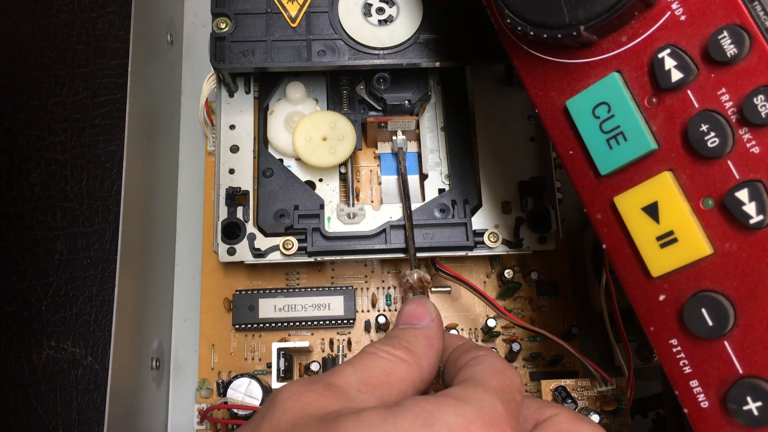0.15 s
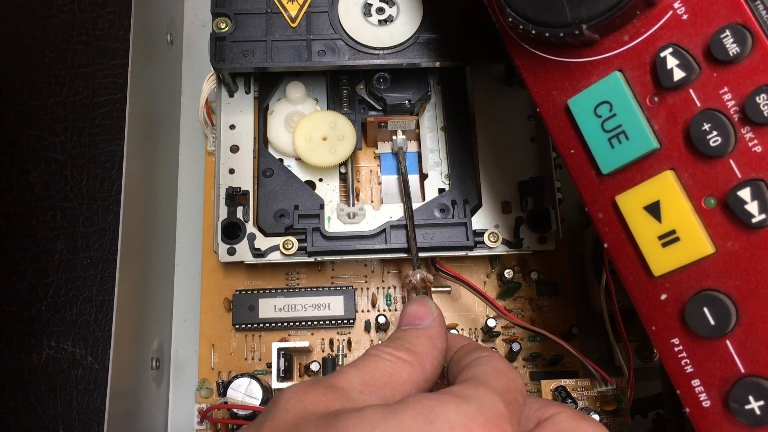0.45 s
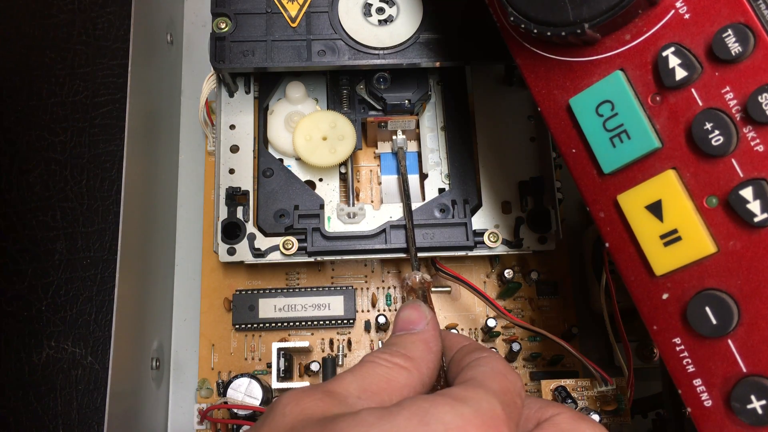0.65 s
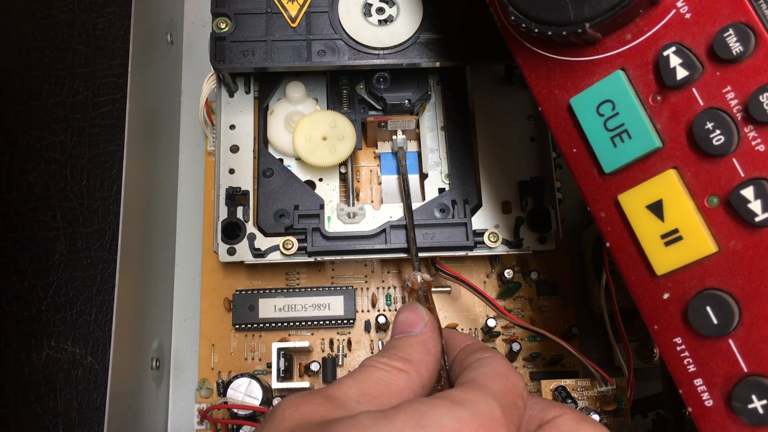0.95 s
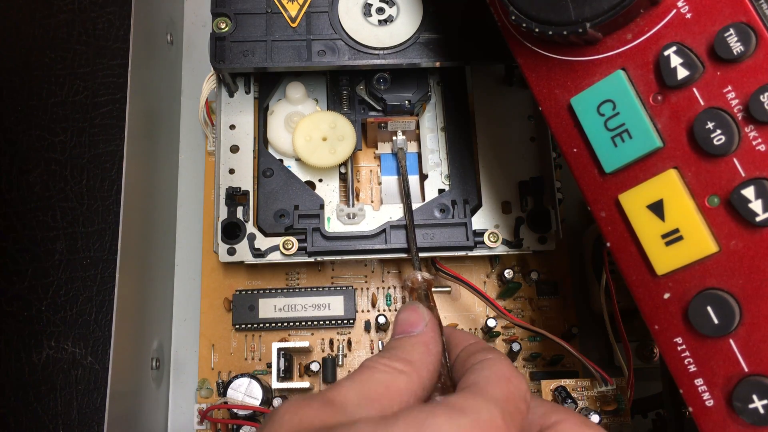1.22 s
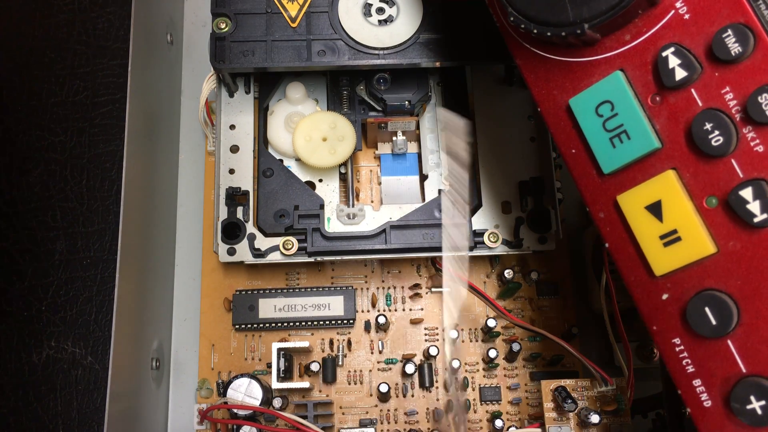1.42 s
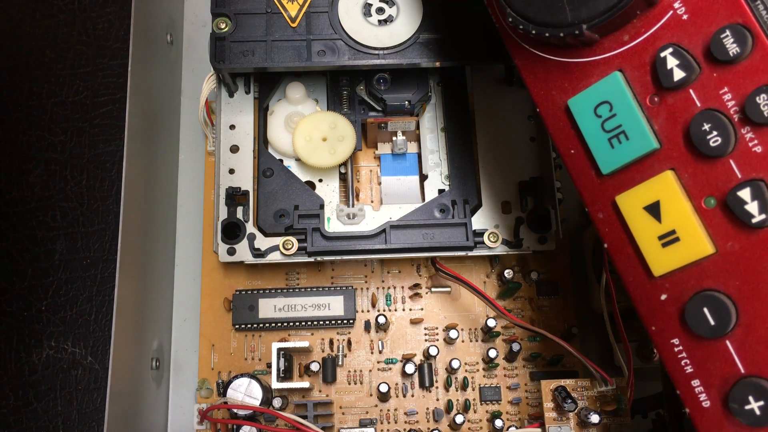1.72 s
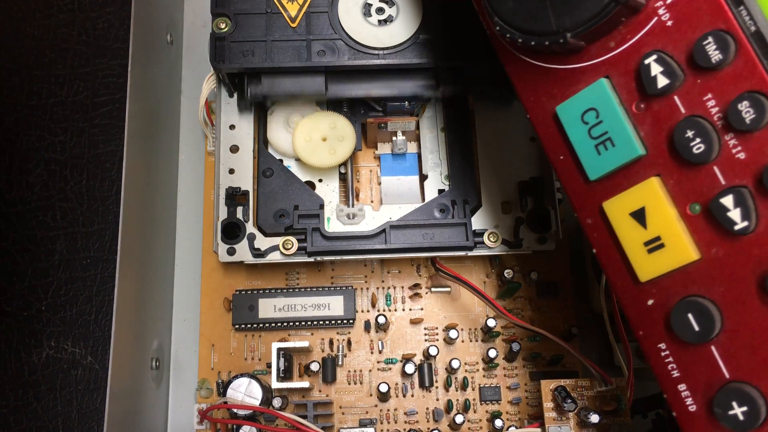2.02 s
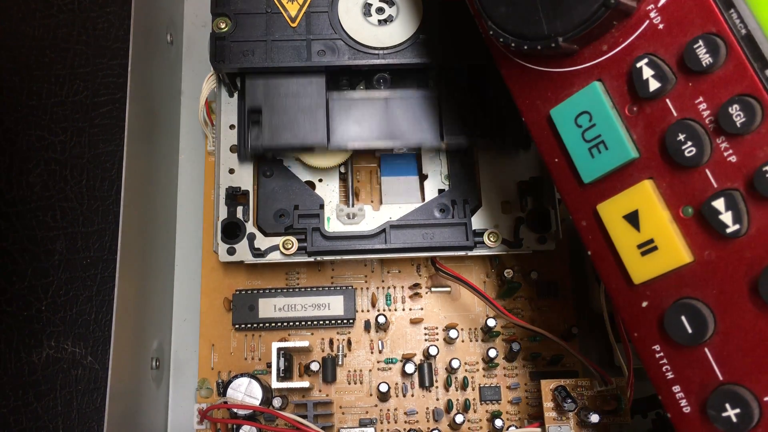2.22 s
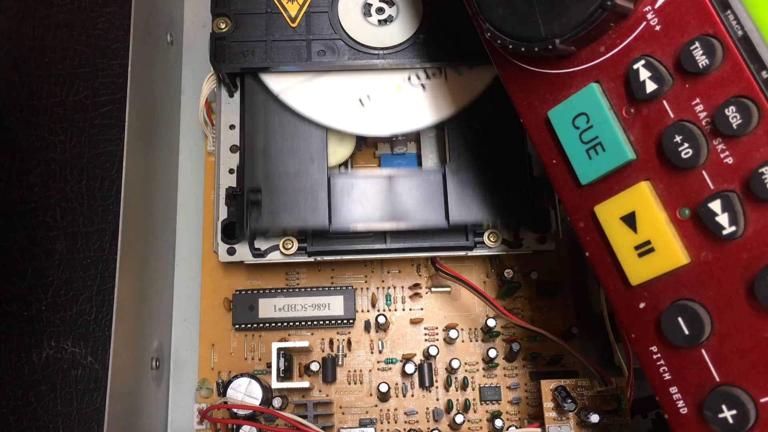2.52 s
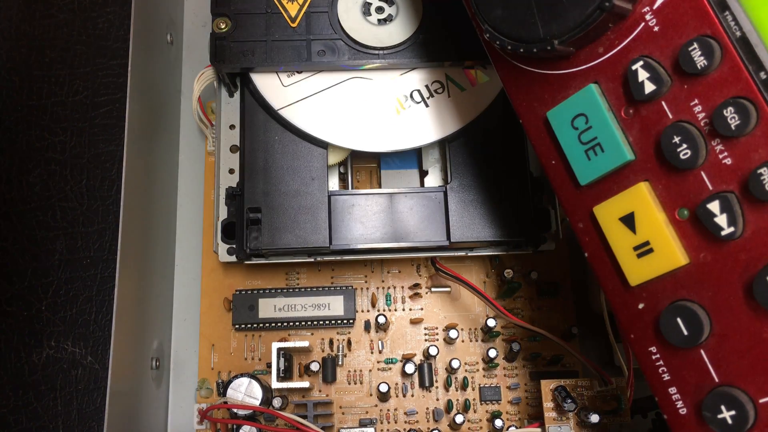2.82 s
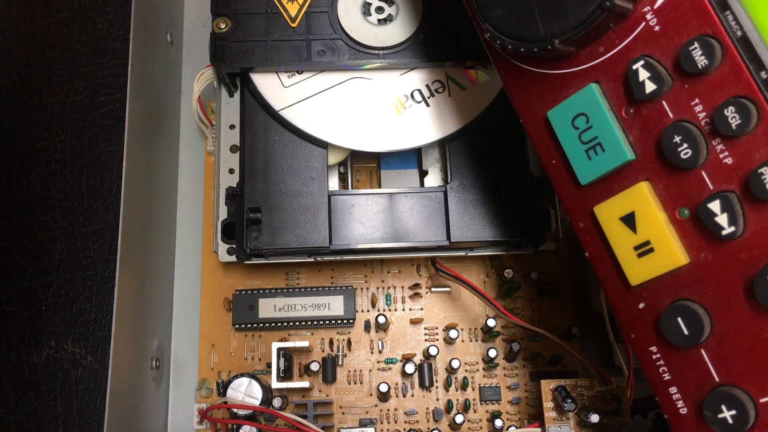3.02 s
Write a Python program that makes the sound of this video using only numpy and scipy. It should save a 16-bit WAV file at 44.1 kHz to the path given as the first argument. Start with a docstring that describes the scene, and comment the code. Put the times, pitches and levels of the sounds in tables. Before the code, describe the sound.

Close up in a quiet room, a disc player's loading tray whirs and rumbles out after a small snap, knocking lightly along the way, then bangs against its stop, rattles briefly and settles.

```python
"""An opened disc player, heard from close above in a quiet room: a soft rush and an airy whine come first.
A screwdriver taps, then scrapes out with a thin steel ring; a switch snaps; parts knock and rub.
The loading motor whirs, hums and rumbles: noise chopped by gear teeth, two hissing bands, two sines.
The tray hits its stop: decaying sines, a noisy shudder and a long chassis ring, then a latch plinks.
Contacts echo in the case and the room; frame bumps are low decaying sines; shaped noise is the room tone."""
import sys
import numpy as np
from scipy import signal
from scipy.fft import rfft, irfft
from scipy.io import wavfile

SR = 44100
rng = np.random.default_rng(int(sys.argv[2]) if len(sys.argv) > 2 else 0)


def inscribe(sig):
    """Save sig as 16-bit PCM at rate SR to the path in sys.argv[1].

    A 1-D sig is mono; a 2-D sig holds one channel per row.
    Samples are clipped to [-1, 1] before scaling.
    """
    pcm = np.round(np.clip(np.atleast_2d(sig).T, -1, 1) * 32767)
    wavfile.write(sys.argv[1], SR, pcm.astype(np.int16))


N = 138915
T = np.arange(N) / SR  # s


def from_db(db):
    """Amplitude factor of a level in dB."""
    return 10 ** (np.asarray(db) / 20)


def rms_one(x):
    """Scales a signal to rms 1."""
    return x / np.sqrt(np.mean(x ** 2) + 1e-20)


def at_hz(points, hz):
    """Reads a table on a log-frequency axis."""
    points_hz, value = np.transpose(points)
    return np.interp(np.log(hz + 1e-3), np.log(points_hz), value)


def in_time(points):
    """Reads a table at every sample, linear between its rows."""
    return np.interp(T, *np.transpose(points))


def noise():
    """White noise, rms 1."""
    return rng.standard_normal(N)


def colour(x, spectrum, tilt_db_per_octave=0):
    """Gives a steady signal a spectrum; rms 1."""
    hz = np.arange(N // 2 + 1) * SR / N
    gain_db = at_hz(spectrum, hz) + tilt_db_per_octave * np.log2(hz + 20)
    return rms_one(irfft(rfft(x) * from_db(gain_db), N))


def band(x, hz, kind, order=2):
    """Butterworth filter."""
    sos = signal.butter(order, hz, kind, fs=SR, output="sos")
    return signal.sosfilt(sos, x + 1e-18)


def drift(rate_hz):
    """Chance variation slower than a rate, rms 1."""
    return rms_one(band(noise(), rate_hz, "low"))


def dying(start_s, t60_s):
    """Silence, then an exponential decay from 1."""
    age = np.clip((T - start_s) / t60_s, 0, 10)
    return (T >= start_s) * np.exp(-np.log(1000) * age)


def struck(start_s, modes):
    """Decaying sines set off together, neighbours in opposite directions."""
    out = 0
    for k, (hz, db, t60_s) in enumerate(modes):
        sine = np.sin(2 * np.pi * hz * (T - start_s))
        out = out + (-1) ** k * from_db(db) * dying(start_s, t60_s) * sine
    return out


def singing_band(track, half_width_hz):
    """A narrow band of noise that follows a track of pitch and level."""
    s, hz, db = np.transpose(track)
    phase = 2 * np.pi * np.cumsum(np.interp(T, s, hz)) / SR
    carrier = drift(half_width_hz) * np.cos(phase) + drift(half_width_hz) * np.sin(phase)
    return from_db(np.interp(T, s, db)) * carrier


# Resonances of the plastic deck. Each row: frequency in Hz, width in Hz, peak in dB over the direct sound.
DECK = [(285, 68, -4.5), (1147, 345, 2), (1374, 90, 0), (1532, 41, 1.5), (2060, 130, -2.5),
        (3140, 170, 0.5), (3676, 160, 2), (4146, 68, -3), (5800, 450, -4), (8550, 200, -1.5),
        (9160, 240, -6.5), (11760, 250, -5)]


def deck(x):
    """The direct sound plus the two-pole resonances of the deck."""
    out = x.copy()
    for hz, width_hz, db in DECK:
        r = np.exp(-np.pi * width_hz / SR)
        zeros = np.array([1, 0, -1]) * (1 - r * r) / 2
        poles = [1, -2 * r * np.cos(2 * np.pi * hz / SR), r * r]
        out += from_db(db) * signal.lfilter(zeros, poles, x)
    return out


MOTOR_ON_S, MOTOR_OFF_S, MOTOR_RISE_S, MOTOR_FALL_S = 1.435, 2.79, 0.041, .07
TOOTH_HZ, TOOTH_DEPTH, TOOTH_ROUGH, SPEED_WAVER = 161, .34, .1, .007
HUM_WANDER, HUM_FLUTTER = .08, .65  # rms, fraction of pitch and of level
SING_HALF_WIDTH_HZ = 340
# Friction noise ahead of the deck. Each row: frequency in Hz, relative level in dB.
WHIR = [(500, 4), (700, -11), (900, 1), (1400, 1), (1800, -4.5), (2700, -6.5), (3500, -7), (5000, -12),
        (7500, -11.5), (9300, -14), (10500, -16), (12500, -15), (15500, -23.5)]
# Friction noise. Each row: time in s, level in dB.
WHIR_LEVEL = [(1.45, -61.5), (1.68, -62.5), (1.95, -61), (2.15, -63), (2.3, -61.5), (2.4, -61.5),
              (2.6, -64), (2.78, -60)]
# Thin hissing bands of the gears. Each row: time in s, centre in Hz, level in dB.
SING_HIGH = [(1.42, 11600, -95), (1.52, 11700, -89), (1.85, 11800, -81), (2.05, 12550, -87),
             (2.4, 12850, -88.5), (2.8, 12900, -91)]
SING_LOW = [(1.42, 10300, -93), (1.55, 10200, -82), (1.85, 9400, -91), (2.1, 9400, -80), (2.5, 9300, -80),
            (2.8, 9000, -83.5)]
# Tray rumble ahead of the deck. Each row: frequency in Hz, relative level in dB.
RUMBLE = [(50, -11.5), (110, -5.5), (170, 7), (290, 4.5), (400, -2), (600, -16.5), (1000, -51)]
# Tray rumble. Each row: time in s, level in dB.
RUMBLE_LEVEL = [(1.44, -66), (1.55, -56), (1.65, -65.5), (1.85, -60), (2.05, -60), (2.2, -62.5), (2.4, -62),
                (2.47, -58.5), (2.55, -54), (2.62, -63.5), (2.8, -73)]
# Drive tones. Each row: mean frequency in Hz, sine peak in dB before flutter.
HUM = [(157, -67), (282, -66)]


def drive_hum():
    """Sines that each wander in pitch and flutter in level by chance."""
    out = 0
    for hz, db in HUM:
        phase = 2 * np.pi * hz * np.cumsum(1 + HUM_WANDER * drift(6.86)) / SR
        out = out + from_db(db) * np.sin(phase) * (1 + HUM_FLUTTER * drift(35))
    return out


def motor():
    """Gear teeth chop the friction noise, while the drive hums and the tray rumbles."""
    rise = np.clip((T - MOTOR_ON_S) / MOTOR_RISE_S, 0, 1)
    fall = np.clip(1 - (T - MOTOR_OFF_S) / MOTOR_FALL_S, 0, 1)
    turning = 2 * np.pi * np.cumsum(1 + SPEED_WAVER * drift(7.4)) / SR
    teeth = rms_one(np.exp(TOOTH_DEPTH * np.cos(TOOTH_HZ * turning) + TOOTH_ROUGH * drift(120)))
    friction = band(colour(noise(), WHIR), 500, "high")
    whir = from_db(in_time(WHIR_LEVEL)) * rms_one(deck(friction))
    sing = singing_band(SING_HIGH, SING_HALF_WIDTH_HZ) + singing_band(SING_LOW, SING_HALF_WIDTH_HZ)
    rumble = from_db(in_time(RUMBLE_LEVEL)) * rms_one(deck(colour(noise(), RUMBLE)))
    return rise * fall * (teeth * (whir + sing) + rumble + drive_hum())


STOP_S = 2.8222
# Tray against its stop. Each row: frequency in Hz, level in dB, t60 in s.
STOP = [(420, -39, 0.016), (565, -32, 0.038), (675, -32.5, .05), (793, -31.5, .05), (1075, -31, .055),
        (1155, -31, .05), (1382, -29, 0.057), (1790, -39.5, 0.044), (2055, -18, 0.02), (2250, -17, 0.026),
        (3264, -14.5, .013), (3474, -15, 0.012), (3990, -16.5, .014), (5600, -32.5, 0.013),
        (8500, -33.5, 0.0074)]
# Long metal ring. Each row: frequency in Hz, level in dB, t60 in s.
CHASSIS = [(770, -50.5, 0.54), (2060, -67, 0.45), (2270, -61.5, .85)]


def end_stop():
    """The tray's hit sets off short modes and the long ring of the chassis."""
    return struck(STOP_S, STOP) + struck(STOP_S, CHASSIS)


SHUDDER_DB, SHUDDER_T60_S, SHUDDER_ROUGH = -32.5, 0.094, .3
# Whole tray shuddering. Each row: frequency in Hz, relative level in dB.
SHUDDER = [(60, -25.5), (160, -4.5), (270, -17), (550, -3), (900, -6), (1300, -3), (1750, -7), (2300, 3.5),
           (3700, -10), (5500, -15), (8000, -27.5), (15000, -40.5)]


def shudder():
    """The dense, rattling ring of the tray after the stop: rough, decaying noise."""
    rattle = np.exp(SHUDDER_ROUGH * drift(200))
    return from_db(SHUDDER_DB) * dying(STOP_S, SHUDDER_T60_S) * rattle * colour(noise(), SHUDDER)


BASS_TOP_HZ, TREBLE_FROM_HZ, BASS_LINGERS = 507, 2030, 1.4
# Knocks and ticks of small parts, the switch and the tray reaching its stop.
# Each row: start in s, bass, middle and treble level in dB,
# t60 in s of middle and treble (the bass takes BASS_LINGERS times as long).
KNOCKS = [(.536, -83, -53.5, -62, 0.031), (.914, -72, -62, -71, .02), (1.2867, -66, -55, -49, 0.022),
          (1.4005, -45, -45, -41, 0.0083), (1.4212, -48, -71, -83, 0.035), (1.4352, -55, -68, -55, 0.021),
          (1.4435, -67, -47, -55, 0.032), (1.4507, -58, -41, -50.5, 0.047),
          (1.5222, -68, -52.5, -45, 0.053), (1.5438, -42.5, -43.5, -47, 0.046), (1.573, -53, -59, -55, .03),
          (1.6203, -69, -56, -51.5, 0.074), (1.7202, -84, -49, -46, 0.038),
          (1.7421, -56, -52.5, -42, 0.068), (1.782, -62, -51, -48.5, 0.04), (1.807, -70, -55, -58, 0.032),
          (1.827, -81, -57.5, -53, 0.038), (1.8722, -56, -50, -52, 0.029), (1.883, -56, -71, -47.5, 0.051),
          (1.9672, -47, -61, -58, 0.014), (1.9835, -40, -57, -50.5, 0.012), (2.046, -59, -51, -54, 0.033),
          (2.291, -55, -54.5, -52, 0.049), (2.4447, -51.5, -41.5, -53.5, 0.046),
          (2.458, -54, -45.5, -54.5, 0.079), (2.49, -54, -39, -65, 0.028), (2.514, -63.5, -55, -52.5, .05),
          (2.6399, -53.5, -48, -66, 0.12), (2.6586, -48.5, -40, -49.5, 0.067),
          (2.7742, -47, -43.5, -51, .035), (2.7868, -43, -37, -47.5, 0.055), (2.798, -58, -55, -40, 0.013),
          (2.8113, -40.5, -33.5, -33.5, 0.011), (2.813, -34, -28, -31, 0.027),
          (2.8183, -46.5, -34.5, -39, 0.04), (2.8225, -37, -23.5, -19.5, 0.0091),
          (2.893, -73, -42.5, -58, .04), (2.8989, -54, -39, -58.5, 0.048), (2.919, -60, -49, -71, .04)]
# Knock noise ahead of the deck. Each row: frequency in Hz, relative level in dB.
KNOCK_COLOUR = [(60, -18.5), (150, 1.5), (300, -6.5), (500, 3.5), (720, -4.5), (1150, 6), (1700, 2),
                (2500, 3), (4000, 1.5), (7000, -7.5), (11000, -12), (15500, -22)]


def knocks():
    """Each knock sets off a dense cloud of short modes, as decaying noise; the bass lingers."""
    ranges = [
        (BASS_TOP_HZ, "low", BASS_LINGERS),
        ([BASS_TOP_HZ, TREBLE_FROM_HZ], "band", 1),
        (TREBLE_FROM_HZ, "high", 1),
    ]
    out = 0
    for k, (hz, kind, longer) in enumerate(ranges):
        cloud = colour(noise(), KNOCK_COLOUR)
        envelope = sum(from_db(levels[k]) * dying(s, t60_s * longer) for s, *levels, t60_s in KNOCKS)
        steady_level = np.std(deck(band(cloud, hz, kind, order=3)))
        out = out + band(cloud * envelope, hz, kind, order=3) / steady_level
    return deck(out)


RUB_GRAINS_PER_S, RUB_SMOOTH, RUB_UNEVEN = 1500, 0.88, 0.22
# Parts rub past each other. Each row: start in s, length in s, level in dB, tilt in dB per octave.
RUBS = [(1.266, 0.065, -54.5, 0.5), (1.318, 0.079, -78, -1), (1.438, 0.087, -54, 0),
        (2.034, 0.063, -55.5, 1.5), (2.418, 0.13, -54, 0)]
# Rub noise after the deck. Each row: frequency in Hz, gain in dB.
RUB_COLOUR = [(100, 0), (270, 18.5), (700, -1.5), (1250, 1), (2200, -3), (3600, -1), (6500, -5),
              (9000, -12), (15000, -22)]


def rubs():
    """Tiny slips under an uneven stroke that swells and fades."""
    out = 0
    for start_s, length_s, db, tilt_db_per_octave in RUBS:
        grains = noise() * (rng.random(N) < RUB_GRAINS_PER_S / SR)
        slips = rms_one(grains) + RUB_SMOOTH * noise()
        swell = np.sin(np.pi * np.clip((T - start_s) / length_s, 0, 1))
        stroke = swell * np.exp(RUB_UNEVEN * drift(90))
        out = out + from_db(db) * stroke * colour(deck(slips), RUB_COLOUR, tilt_db_per_octave)
    return out


TAP_S = .5365
# Screwdriver tip on the pickup. Each row: frequency in Hz, level in dB, t60 in s.
TAP = [(856, -57, 0.09), (1023, -56, .07), (1247, -59, 0.089), (2050, -63, 0.049), (2250, -62, 0.033),
       (4360, -54.5, 0.017)]


def screwdriver_tap():
    """The tip sets off short modes of the pickup."""
    return struck(TAP_S, TAP)


SHAFT_HALF_WIDTH_HZ = 110
# Steel shaft scraping out. Each row: time in s, centre in Hz, level in dB.
SHAFT = [(1.265, 11900, -110), (1.283, 11900, -69), (1.308, 11900, -66), (1.34, 11900, -110)]


def shaft():
    """The shaft sings thinly: one narrow, high band of noise."""
    return singing_band(SHAFT, SHAFT_HALF_WIDTH_HZ)


SWITCH_S = 1.4004
# Switch snapping. Each row: frequency in Hz, level in dB, t60 in s.
SWITCH = [(249, -52, 0.12), (373, -43, 0.085), (467, -45.5, 0.076), (800, -48, 0.053), (1240, -53, 0.059),
          (1620, -36.5, 0.015), (1850, -40, 0.022), (2204, -40.5, 0.026), (4150, -39.5, .012),
          (4530, -39.5, 0.013)]


def switch():
    """The snap sets off short modes."""
    return struck(SWITCH_S, SWITCH)


LATCH_S = 3.0005
# Latch settling. Each row: frequency in Hz, level in dB, t60 in s.
LATCH = [(1370, -38.5, 0.02), (1490, -42, 0.012)]


def latch():
    """A last small plink of short modes as the latch settles."""
    return struck(LATCH_S, LATCH)


# Bumps of the sprung frame. Each row: start in s, gain in dB.
BUMPS = [(1.875, 2), (1.987, -14.5), (2.469, -20), (2.824, -10)]
# Frame modes ahead of that gain. Each row: frequency in Hz, level in dB, t60 in s.
FRAME = [(48.3, -43, 0.11), (72, -38.5, 0.27), (165, -44, 0.16), (258, -41, .065)]


def bumps():
    """The frame bounces on its rubber mounts: low decaying sines."""
    return sum(from_db(db) * struck(s, FRAME) for s, db in BUMPS)


CASE_T60_S, CASE_DB = 0.045, -18
# Decay of the room. Each row: frequency in Hz, t60 in s.
ROOM_T60 = [(150, .5), (600, 0.23), (2000, 0.18), (5000, 0.213), (12000, 0.24)]
# Tail level ahead of the octave filter. Each row: frequency in Hz, level in dB.
ROOM_SEND = [(150, -5.5), (600, -10.5), (1400, -17), (3000, -25.5), (12000, -23.5)]


def reflections(x):
    """A quick flutter in the open case and a faint room tail, decaying noise in octave bands."""
    flutter = noise() * dying(0.0015, CASE_T60_S)
    response = from_db(CASE_DB) * flutter / np.linalg.norm(flutter)
    for low_hz in 62.5 * 2 ** np.arange(8):
        centre_hz = low_hz * np.sqrt(2)
        tail = dying(0.024, at_hz(ROOM_T60, centre_hz))
        octave = band(noise() * tail, [low_hz, 2 * low_hz], "band")
        response += from_db(at_hz(ROOM_SEND, centre_hz)) * octave / np.linalg.norm(tail)
    return signal.fftconvolve(x, response)[:N]


# Soft rush. Each row: frequency in Hz, relative level in dB.
RUSH = [(100, -10.5), (190, 8), (300, 0.5), (500, -4.5), (950, -5), (1330, -1), (1900, -10), (4000, -25),
        (12000, -31)]
# Soft rush fading away. Each row: time in s, level in dB.
RUSH_LEVEL = [(0, -71.5), (.15, -70), (.35, -74.5), (.55, -76.5), (.75, -83), (1.2, -83)]


def rush():
    """Shaped noise that fades away."""
    return from_db(in_time(RUSH_LEVEL)) * colour(noise(), RUSH)


WHINE_HALF_WIDTH_HZ = 55
# Faint, airy whine. Each row: time in s, centre in Hz, level in dB.
WHINE = [(0, 1290, -74), (.14, 1390, -74.5), (.25, 1250, -79.5), (.38, 1256, -85), (.52, 1223, -74),
         (.7, 1214, -92)]


def whine():
    """A narrow band of noise that rises, sinks, swells once more and fades."""
    return singing_band(WHINE, WHINE_HALF_WIDTH_HZ)


FLOOR_DB = -70
# Room tone. Each row: frequency in Hz, relative level in dB per Hz.
FLOOR = [(20, -9.5), (55, 3.5), (120, -0.5), (200, 2), (300, -3.5), (450, -8), (800, -9.5), (1300, -11.5),
         (2200, -15), (4000, -19.5), (8000, -23), (13000, -26.5), (15500, -41.5)]


def room_tone():
    """Steady shaped noise, weaker towards the treble."""
    return from_db(FLOOR_DB) * colour(noise(), FLOOR)


CONTACT_LOW_CUT_HZ = 170


def scene():
    """Contacts, thinned of deep bass, echo in case and room; bumps, motor and background stay dry."""
    hits = knocks() + screwdriver_tap() + switch() + end_stop() + latch()
    scrapes = rubs() + shaft()
    contacts = band(hits + scrapes + shudder(), CONTACT_LOW_CUT_HZ, "high")
    background = room_tone() + rush() + whine()
    return (contacts + reflections(contacts) + bumps() + motor() + background)[None]


CUTOFF_HZ = 15750


def record(dry):
    """Cuts the top steeply with an elliptic low-pass."""
    sos = signal.ellip(10, .1, 70, CUTOFF_HZ, fs=SR, output="sos")  # ripple dB, stopband dB
    return signal.sosfilt(sos, dry)


dry = scene()
out = record(dry)
inscribe(out)
```